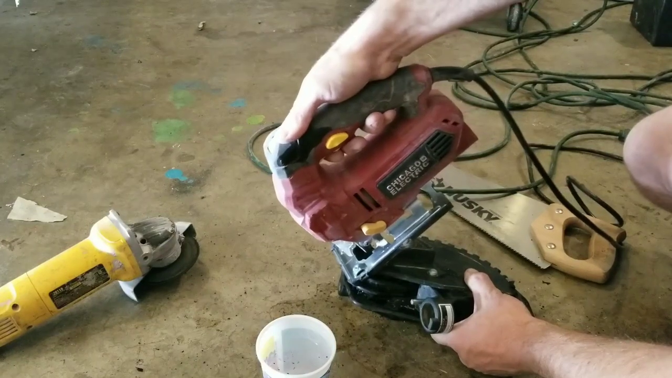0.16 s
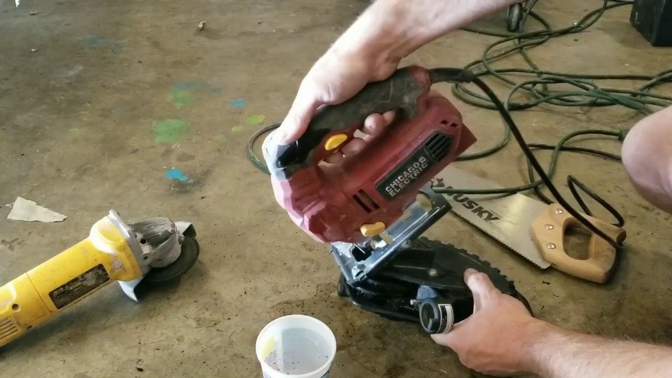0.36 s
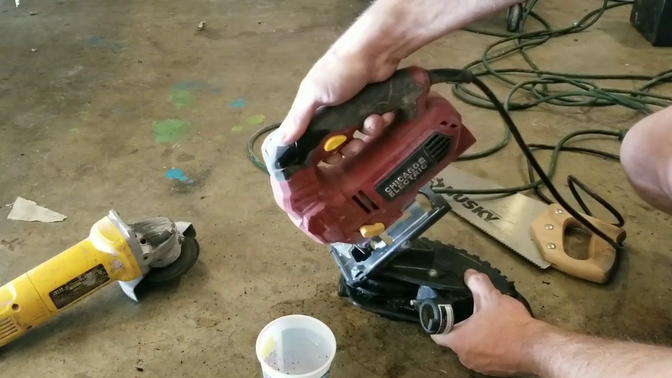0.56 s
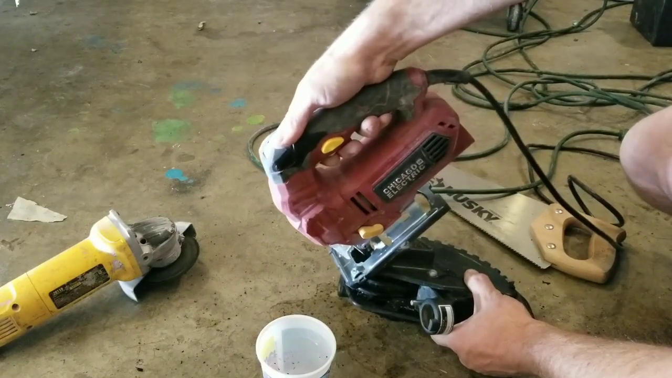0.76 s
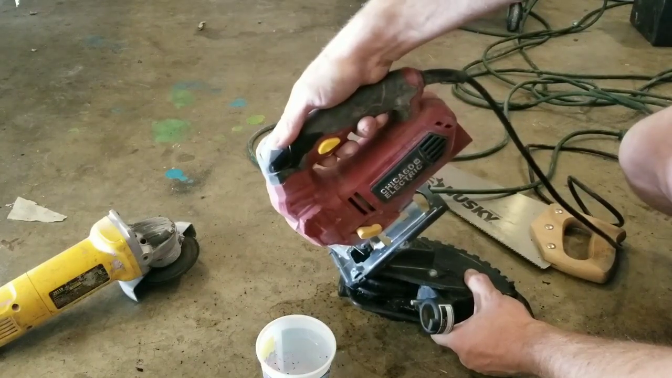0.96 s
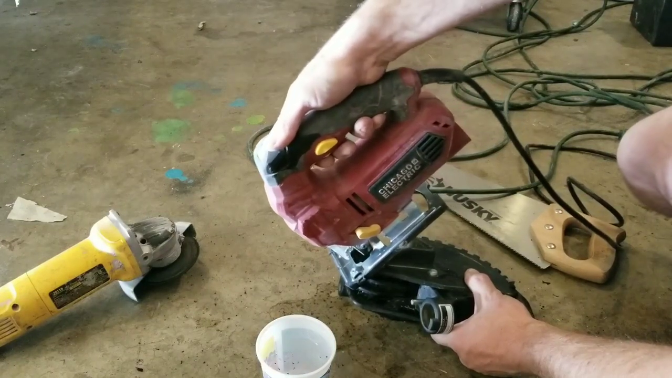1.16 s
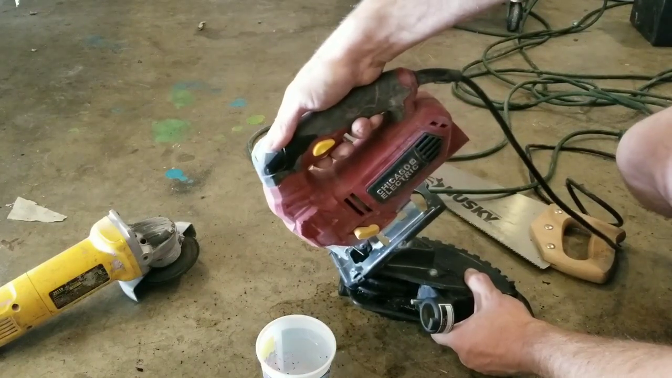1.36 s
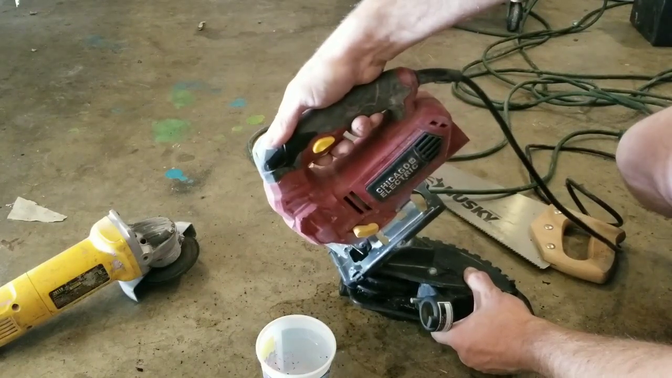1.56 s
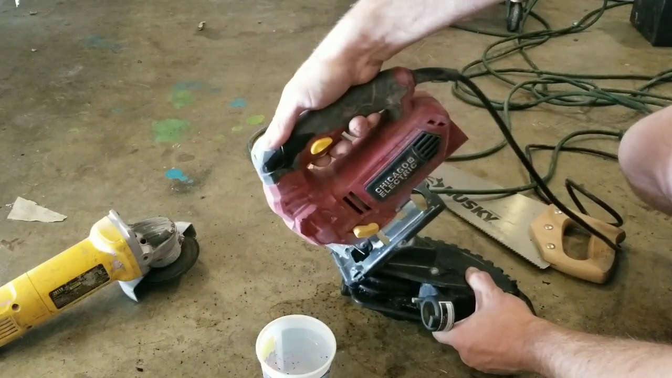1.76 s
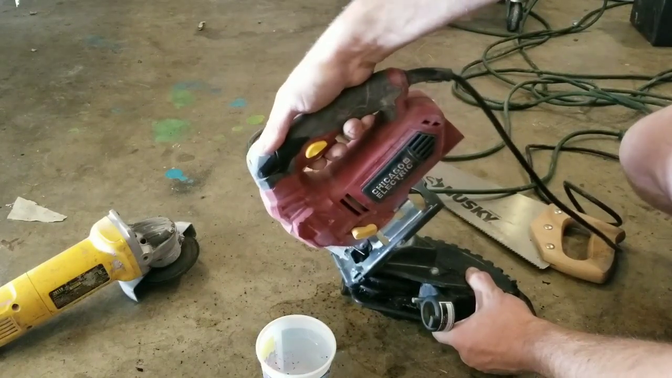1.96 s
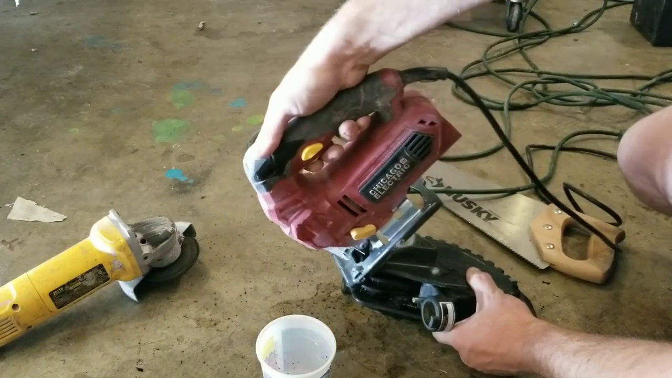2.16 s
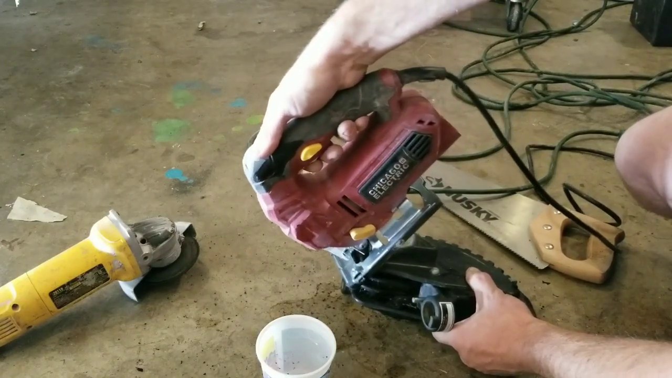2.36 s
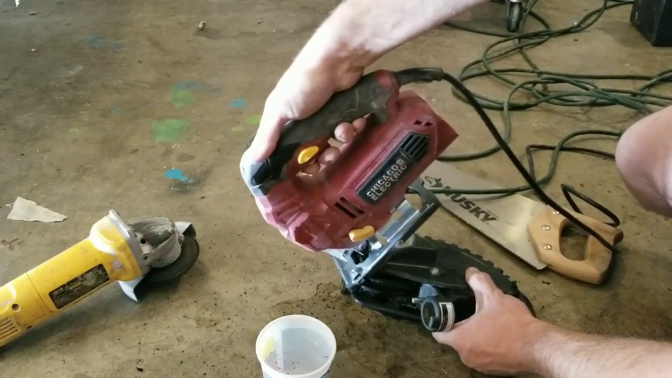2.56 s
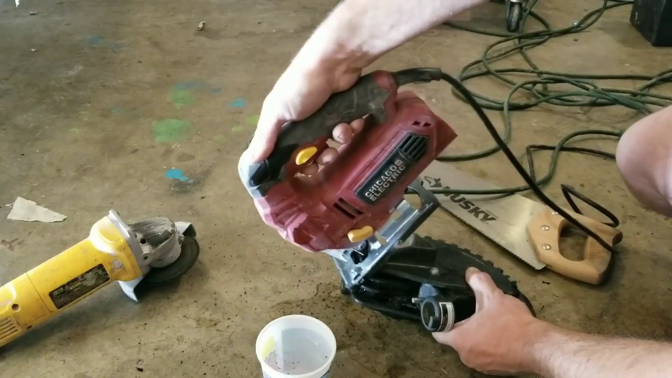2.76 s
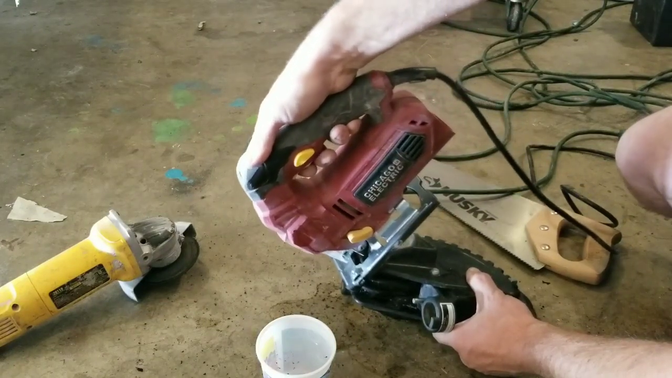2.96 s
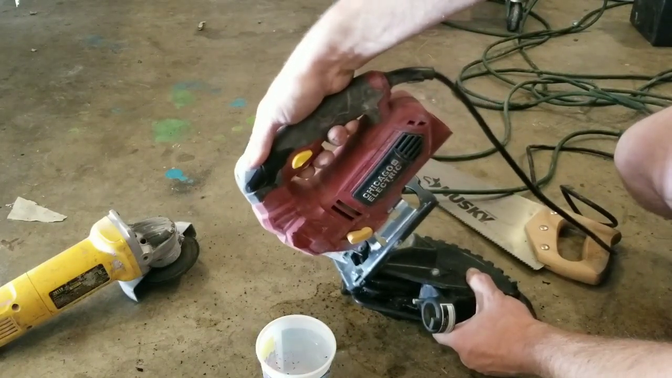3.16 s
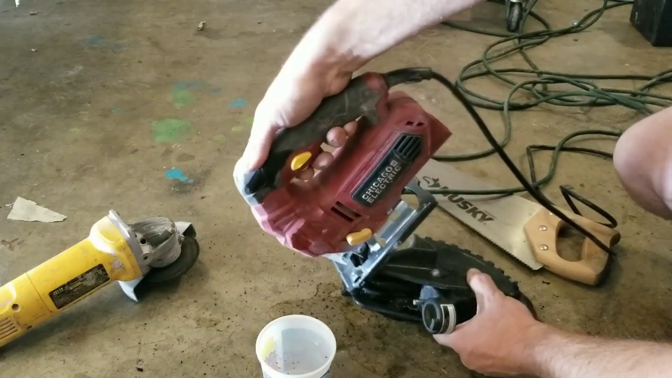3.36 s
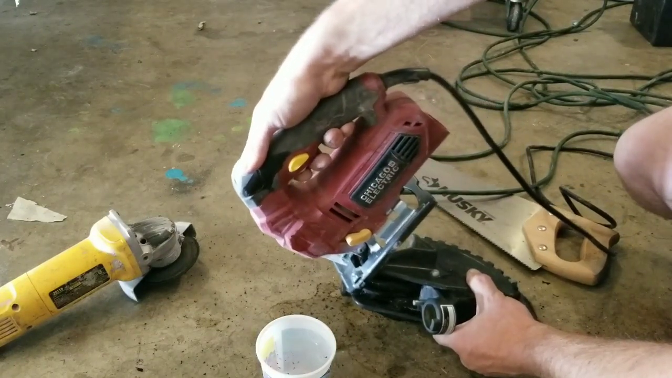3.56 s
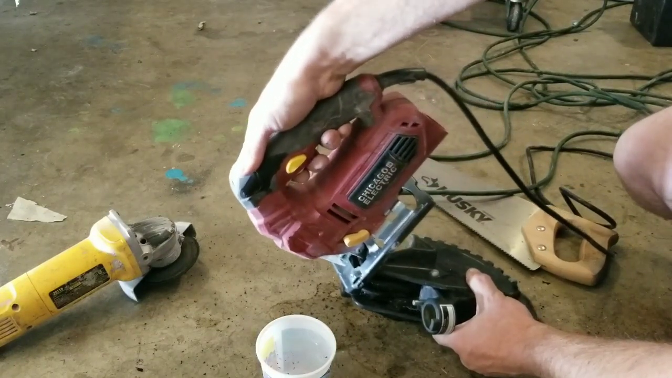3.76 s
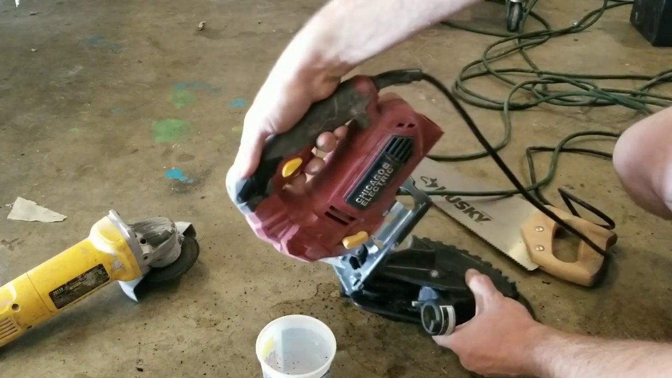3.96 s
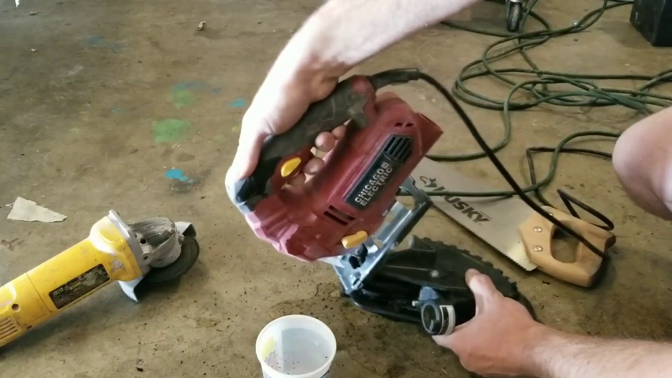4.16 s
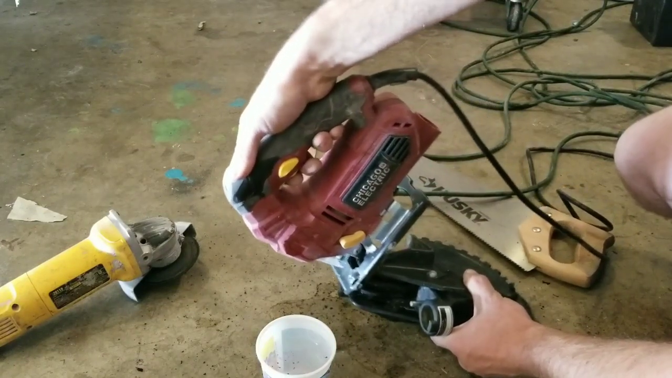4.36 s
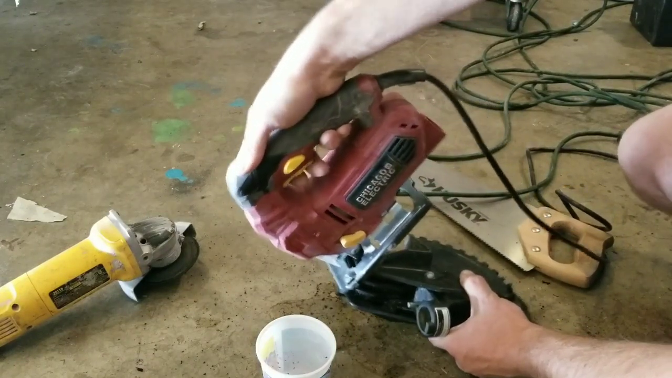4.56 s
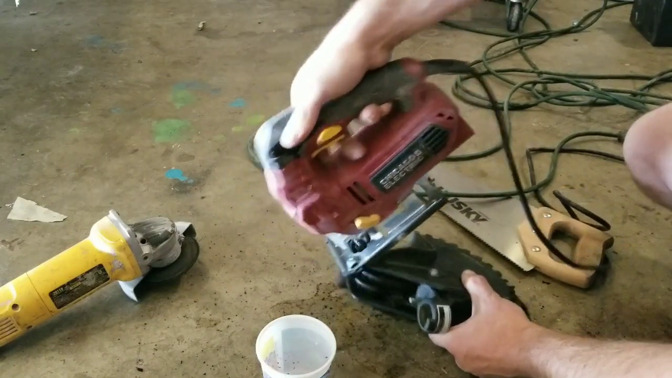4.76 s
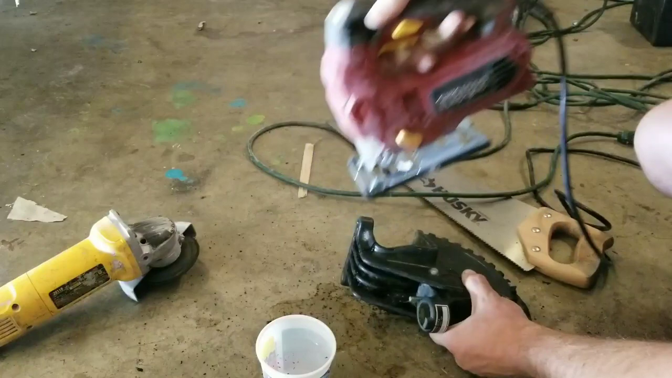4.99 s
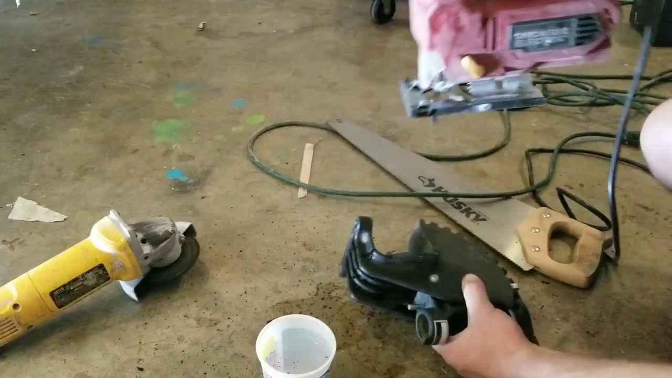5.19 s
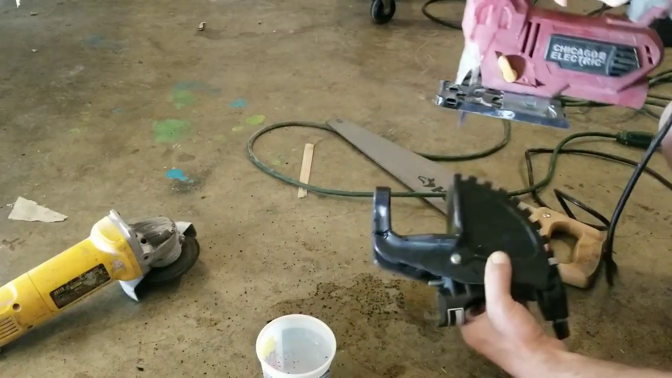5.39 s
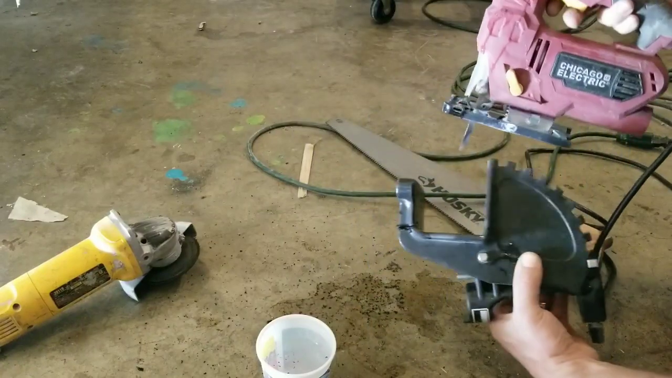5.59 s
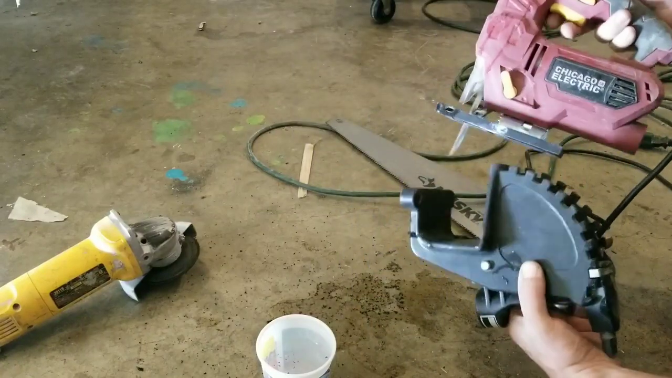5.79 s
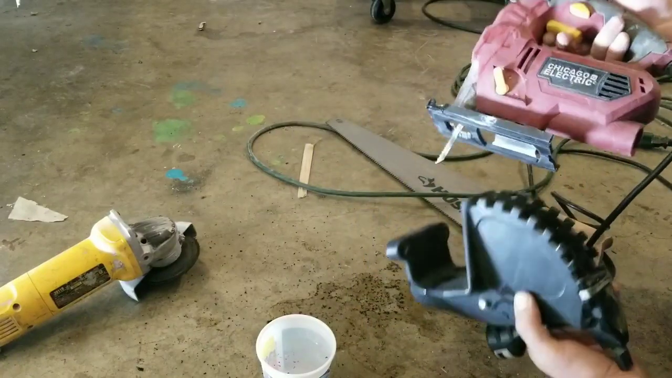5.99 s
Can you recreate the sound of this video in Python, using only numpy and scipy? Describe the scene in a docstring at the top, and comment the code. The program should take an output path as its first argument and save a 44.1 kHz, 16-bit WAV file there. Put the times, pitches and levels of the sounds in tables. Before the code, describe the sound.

A corded jigsaw is already cutting a hard plastic bracket, close to the microphone in a concrete garage. Rapid strokes merge into a coarse, knocking buzz with plastic rasp and a wavering gear whine. Near the end the loosened piece chatters and rings, the blade slips free, and the motor coasts down, whirring lower and louder as it comes closer.

```python
"""An electric jigsaw cuts through a plastic bracket held just above a concrete garage floor.
Its motor drives a crank through a whining gear; every stroke knocks in the housing and rasps through
the plastic: impacts ring resonances, tones follow the shaft, and coloured noise makes chips and air.
Near the end of the cut the loosened piece chatters, the blade comes free and the motor coasts down."""
import sys
import numpy as np
from scipy import signal
from scipy.fft import rfft, irfft, next_fast_len
from scipy.io import wavfile

SR = 44100
rng = np.random.default_rng(int(sys.argv[2]) if len(sys.argv) > 2 else 0)


def inscribe(sig):
    """Save sig as 16-bit PCM at rate SR to the path in sys.argv[1].

    A 1-D sig is mono; a 2-D sig holds one channel per row.
    Samples are clipped to [-1, 1] before scaling.
    """
    pcm = np.round(np.clip(np.atleast_2d(sig).T, -1, 1) * 32767)
    wavfile.write(sys.argv[1], SR, pcm.astype(np.int16))


N = 265922

GEAR_TEETH, PINION_TEETH = 48, 5
SWITCH_OFF_S, BRAKE_S = 4.62, 0.26  # trigger let go; the plastic brakes the blade for this long

# moments of load in every stroke: bite, long pull, return
# [angle/turn, width/turns, tooth load/dB, rasp swell/dB]
LOADED_MOMENTS = [(.53, .04, -1.5, 1.7), (.675, .045, -3.5, 2.6), (.14, .13, -11, 1.8)]
# resonances of the plastic bracket [f/Hz, width/Hz, relative level/dB]
BRACKET_MODES = [(297, 150, -19), (653, 84, -3), (898, 120, 0.5), (1290, 254, 4), (1620, 280, -16),
                 (2150, 1200, -16), (2800, 400, 2), (4430, 500, -4)]


def from_db(db):
    """Decibels to gain."""
    return 10 ** (np.asarray(db) / 20)


def rms_one(x):
    """Scale to rms 1."""
    return x / np.sqrt(np.mean(x ** 2) + 1e-20)


def in_time(rows):
    """Each column of a curve at every sample."""
    s, *columns = np.transpose(rows)
    return [np.interp(np.arange(N) / SR, s, column) for column in columns]


def ramp(start_s, length_s):
    """Rises evenly from 0 to 1."""
    return np.clip((np.arange(N) / SR - start_s) / length_s, 0, 1)


def gain_at(points, hz):
    """Gain of a dB table on a log-frequency axis."""
    f, db = np.transpose(points)
    return from_db(np.interp(np.log(hz + 1), np.log(f), db))


def drift(rate):
    """Smooth chance with rms 1, through a new random value this many times per second."""
    knots = rng.standard_normal(int(rate * N / SR) + 2)
    return rms_one(np.interp(np.arange(N) * rate / SR, np.arange(len(knots)), knots))


def swell(turns, angle, width):
    """A smooth bump once in every turn."""
    distance = (turns - angle + .5) % 1 - .5
    return np.exp(-.5 * (distance / width) ** 2)


def per_stroke(turns):
    """Chance with spread 1, drawn anew for every stroke."""
    return rng.standard_normal(size=400)[turns.astype(int)]


def stereo_noise(spectrum):
    """Coloured noise, alike in the bass and wide in the treble; its middle has spread 1."""
    # stereo width [f/Hz, side minus mid/dB]
    side_width = [(60, -25), (250, -13.5), (500, -12.5), (1000, -8), (2000, -5.5), (4000, -1), (8000, 0),
                  (15000, -1)]
    # stereo balance [f/Hz, left minus right/dB]
    balance = [(500, 1), (1500, -1), (2800, 2.5), (4200, -1), (5600, 1), (6900, -6.5), (8000, 2.5),
               (11000, 3.5), (14500, -1.5)]
    size = next_fast_len(N)
    mid, side = rfft(rng.standard_normal((2, size)))
    hz = np.arange(len(mid)) * SR / size
    side = side * gain_at(side_width, hz)
    left_over_right = gain_at(balance, hz)
    pair = np.array([(mid + side) * left_over_right, mid - side]) / np.sqrt(1 + left_over_right ** 2)
    pair = irfft(pair * gain_at(spectrum, hz), size)[:, :N]
    return pair / np.std(pair.mean(axis=0))


def resonate(x, modes):
    """Parallel two-pole resonances with alternating signs; a narrower mode rings longer."""
    out = 0
    for k, (hz, width, db) in enumerate(modes):
        r = np.exp(-np.pi * width / SR)
        zeros = [(1 - r * r) / 2, 0, (r * r - 1) / 2]
        poles = [1, -2 * r * np.cos(2 * np.pi * hz / SR), r * r]
        out = out + (-1) ** k * from_db(db) * signal.lfilter(zeros, poles, x + 1e-18)
    return out


def tone(turns, flutter_db, spread):
    """A sine of rms 1 whose level and phase (spread in radians) waver on their way to each ear."""
    ears = []
    for ear in range(2):
        level = np.sqrt(2) * from_db(flutter_db * drift(11))
        ears.append(level * np.sin(2 * np.pi * turns + spread * drift(7.6)))
    return np.array(ears)


def bursts(events, decay_s):
    """An envelope that jumps at each event and dies away."""
    kicks = np.zeros(N)
    for s, db in events:
        kicks[round(s * SR)] = from_db(db)
    return signal.lfilter([1], [1, -np.exp(-1 / (decay_s * SR))], kicks)


def blade_speed(friction_hz_per_s=6.45, drag_loss_hz=21.5, drag_s=1.5, brake_loss_hz=4.68):
    """Strokes per second: sagging in the cut, then slowed by friction, early air drag and the plastic."""
    # blade speed while the trigger is held [t/s, stroke rate/Hz]
    held_speed = [(0, 40.33), (.729, 39.485), (1.665, 39.252), (2.164, 38.365), (2.673, 38.418),
                  (3.421, 37.634), (4.042, 37.306)]
    coast_s = np.maximum(np.arange(N) / SR - SWITCH_OFF_S, 0)
    friction = friction_hz_per_s * coast_s
    drag = drag_loss_hz * (1 - np.exp(-coast_s / drag_s))
    brake = brake_loss_hz * ramp(SWITCH_OFF_S, BRAKE_S)
    return in_time(held_speed)[0] - friction - drag - brake


def hand():
    """Push in dB, and the forward lean from 0 to 1."""
    # the hand on the saw; lean shifts from the backward to the forward housing modes
    # [t/s, push into the cut/dB, forward lean/dB]
    grip = [(0, 1, -9), (.45, .5, -24), (1.4, 0, -11.5), (2.1, 0, -10), (3.1, -1, 3), (4.55, .5, 10),
            (4.85, -2.5, -3)]
    push_db, lean_db = in_time(grip)
    return push_db, 1 / (1 + from_db(-lean_db))


def touching(clear_s=4.83, release_s=0.37):
    """1 while the blade rubs on the bracket, falling to 0 as it slips clear."""
    return (1 - ramp(clear_s, release_s)) ** 2


def over_stroke(turns, slack_db=-64.0):
    """Tooth load and rasp gain swell around each loaded moment of the turn."""
    load, rasp_db = from_db(slack_db), 0
    for angle, width, tooth_db, swell_db in LOADED_MOMENTS:
        bump = swell(turns, angle, width)
        load = load + from_db(tooth_db) * bump
        rasp_db = rasp_db + swell_db * bump
    return load, from_db(rasp_db)


def reversal_throb(turns, depth):
    """Level swing that peaks twice a stroke, at each reversal of the blade."""
    return 1 + depth * np.cos(4 * np.pi * (turns - LOADED_MOMENTS[0][0]))


def crank_force(speed, settle_rise_db=15.0, settle_s=0.36, idle_db=-11.0, idle_power=2.0,
                speed_power=1.7, push_share=0.27):
    """Force builds as the blade settles into the cut; in free air only the parts' own inertia is left."""
    pace = speed / speed.max()
    force_db = push_share * hand()[0] + settle_rise_db * ramp(0, settle_s)
    cutting = from_db(force_db) * pace ** speed_power
    return cutting * touching() + from_db(idle_db) * pace ** idle_power


def garage_murmur(level_db=-58.5):
    """The low murmur of the garage is steady noise, strongest in the bass."""
    # murmur colour [f/Hz, relative level per Hz/dB]
    murmur_colour = [(30, -16), (60, -8), (95, 0), (150, -10), (400, -31)]
    return from_db(level_db) * stereo_noise(murmur_colour)


def fan(turns, speed, air_db=-26.0, full_flow_hz=26.7, flow_power=1.45, throb=0.14):
    """Rushing air and sliding parts throb at each reversal and fade below the full-flow stroke rate."""
    # air colour [f/Hz, relative level per Hz/dB]
    air_colour = [(30, -46), (90, -38), (160, -25), (350, -16), (530, -14), (730, -5.5), (1100, -6),
                  (1900, -6), (2900, -6), (4200, -10), (6200, -13), (10200, -22), (12500, -16.5),
                  (15400, -16.5)]
    flow = np.minimum(speed / full_flow_hz, 1) ** flow_power
    return from_db(air_db) * flow * stereo_noise(air_colour) * reversal_throb(turns, throb)


def motor(turns, speed, rotor_power=4.3, carrier_db=-54.0, carrier_order=3, whistle_order=42,
          brush_rise_s=0.9):
    """Unbalance, fan and commutator tones all follow the rotor; the brushes start to sing as it coasts."""
    # rotor unbalance carried by the body [rotor f/Hz, level/dB]
    unbalance_level = [(100, -54), (118, -76), (175, -62), (260, -63), (370, -45)]
    # rotor tones [multiple of rotor speed, level at full speed/dB]
    rotor_tones = [(2, -47), (3, -52), (6, -49), (11, -48), (24, -51), (30, -53)]
    # the rotor's high whistle at each pitch [f/Hz, level/dB]
    whistle_level = [(13000, -60), (14800, -44), (15060, -33.5), (15250, -34), (15500, -36), (15650, -55)]
    # brush singing, strongest at the rate of the 24 commutator bars
    # [multiple of rotor speed, level before housing/dB]
    brush_tones = [(24, -39), (30, -51), (36, -54), (42, -57), (48, -48), (54, -52), (60, -49), (66, -50),
                   (72, -48), (78, -50), (84, -51), (96, -53), (108, -54), (120, -55)]
    # how well the housing radiates the brushes [f/Hz, gain/dB]
    brush_colour = [(2500, -17), (3050, -12), (3350, -18), (3700, -5), (3950, .5), (4350, -2), (4700, -2.5),
                    (5100, .5), (5450, -1), (5700, -7), (6100, -13), (6750, -2), (7400, -9), (8000, -13),
                    (11500, -14), (13000, -2), (14500, 2.5), (15500, 1), (16500, -40)]
    gearing = GEAR_TEETH / PINION_TEETH
    rotor, rotor_hz, pace = turns * gearing, speed * gearing, speed / speed.max()
    unbalance = gain_at(unbalance_level, rotor_hz) * tone(rotor, flutter_db=1, spread=0.055)
    # leaning forward, the sliding blade carrier hums at a multiple of the stroke rate
    hum = from_db(carrier_db) * hand()[1] * tone(carrier_order * turns, flutter_db=3.0, spread=0.1)
    for k, db in rotor_tones:
        hum = hum + from_db(db) * tone(k * rotor, flutter_db=7.5, spread=0.66)
    whistle = gain_at(whistle_level, whistle_order * rotor_hz)
    whistle = whistle * tone(whistle_order * rotor, flutter_db=1, spread=.35)
    singing = 0
    for k, db in brush_tones:
        level = from_db(db) * gain_at(brush_colour, k * rotor_hz)
        singing = singing + level * tone(k * rotor + .06 * drift(110), flutter_db=2.5, spread=.45)
    return unbalance + pace ** rotor_power * hum + whistle + ramp(SWITCH_OFF_S, brush_rise_s) * singing


def free_gears(turns, speed, level_db=-32.0, speed_power=1.3, throb=.45):
    """Unloaded, the teeth rattle in their play, most at each reversal, and ring the gear case."""
    # gear case, heard once the blade runs free [f/Hz, width/Hz, relative level/dB]
    case_modes = [(750, 57, -4), (1250, 53, 4), (1490, 90, -1), (1770, 41, 5), (2060, 88, -1),
                  (4290, 150, -6)]
    free = 1 - touching()
    rattle = rng.standard_normal(N) + .5 * rng.standard_normal((2, N))
    ringing = rms_one(resonate(rattle * reversal_throb(turns, throb), case_modes))
    return from_db(level_db) * free * (speed / speed.max()) ** speed_power * ringing


def gear_whine(turns, speed, speed_power=1.4, bead_spread_db=1.15, between_beads=.4,
               coast_between_beads=.3, coast_unrest=.08, octave_unrest=.12, unrest_per_s=90,
               octave_swing=.17):
    """The tooth rate sings in two beads a stroke under its octave; coasting, it slides through resonances.

    Unrest and swing are phase deviations in cycles.
    """
    # gear whine in the cut [t/s, bite level/dB, return level/dB, octave level/dB]
    whine_levels = [(0, -17, -21, -36), (.2, -28, -33, -27), (.4, -31, -35, -37), (.47, -15, -24, -36),
                    (.6, -26, -35, -37), (1.2, -19, -35, -30.5), (1.45, -28.5, -53, -35),
                    (1.85, -22, -55, -40), (2.03, -20, -28, -27), (2.3, -24, -23, -46),
                    (2.47, -27, -27, -37), (2.88, -25, -19.5, -43), (3.15, -23, -36, -38),
                    (3.35, -23, -29, -43), (3.75, -25, -43, -40), (4.0, -37, -46, -44),
                    (4.6, -35, -44, -36), (4.8, -42, -48, -48)]
    # resonances that the coasting whine slides through [f/Hz, width/Hz, level at full speed/dB]
    whine_peaks = [(1340, 190, -27.5), (790, 75, -31)]
    mesh_turns = turns * GEAR_TEETH
    bite, back, octave = from_db(in_time(whine_levels)) * touching()
    # part of the return level sounds all through the stroke
    return_bead = between_beads + (1 - between_beads) * swell(turns, angle=.18, width=.085)
    beads = bite * swell(turns, angle=.595, width=.075) + back * return_bead
    beads = beads * from_db(bead_spread_db * per_stroke(turns))
    mesh = beads * tone(mesh_turns, flutter_db=0.5, spread=0.069)

    response = 0
    for hz, width, db in whine_peaks:
        detuning = 2 * (speed * GEAR_TEETH - hz) / width
        response = response + from_db(db) / (1 + detuning ** 2)
    coast_bead = rms_one(coast_between_beads + swell(turns, angle=.62, width=.13))
    coasting = response * (speed / speed.max()) ** speed_power * coast_bead * ramp(SWITCH_OFF_S, BRAKE_S)
    slide = tone(mesh_turns + coast_unrest * drift(unrest_per_s), flutter_db=2, spread=.2)

    waver = octave_swing * np.sin(2 * np.pi * turns) + octave_unrest * drift(unrest_per_s)
    octave_tone = tone(2 * mesh_turns + waver, flutter_db=0.0, spread=0.72)
    return mesh + coasting * slide + octave * octave_tone


def breakthrough(knock_db=14.0, ring_db=21.5, clatter_db=-13.5, buzz_db=-25.0, buzz_s=0.014,
                 thud_db=7.0, snag_db=0.5, scatter=0.86):
    """Slaps thud on the bracket and leave the loose piece ringing and buzzing; the exiting teeth snag."""
    # about one slap a stroke at first, then uneven bounces mixed with stroke-timed knocks and rings
    # [t/s, relative bracket knock/dB, relative ring of the piece/dB]
    slaps = [(4.464, -16, -24), (4.493, -17, -26), (4.518, -6, -11), (4.547, -9, -10), (4.574, -6, -10),
             (4.6, -11, -12), (4.627, -16, -13), (4.655, -15, -11.5), (4.685, -13, -15), (4.712, -19, -14),
             (4.723, -13, -26), (4.755, -9, -17), (4.783, -24, -18), (4.792, -10, -23), (4.814, -26, -21),
             (4.848, -22, -21), (4.86, -15, -32), (4.891, -14, -26), (4.932, -13, -17), (4.968, -22, -27)]
    # sharp bursts of noise as the cut ends, some in time with the crank's strokes [t/s, relative level/dB]
    snag_events = [(4.7395, -13.5), (4.7725, -10.5), (4.816, -18), (4.883, -26), (4.92, -20.5)]
    # snag colour [f/Hz, relative level per Hz/dB]
    snag_colour = [(100, -40), (300, -13), (1500, -24), (4200, 6.5), (8000, -4), (11000, -7), (15500, -11)]
    # resonances of the piece being cut off [f/Hz, width/Hz, relative level/dB]
    piece_modes = [(1335, 85, 7), (1435, 65, 5), (1790, 110, -1), (2100, 220, -3)]
    knocks = [(s, db) for s, db, _ in slaps]
    rings = [(s, db) for s, _, db in slaps]
    contact = rng.standard_normal(N) + scatter * rng.standard_normal((2, N))
    clatter = from_db(clatter_db) * contact * bursts(knocks, decay_s=0.0048)
    blows = bursts(knocks, decay_s=0.00019) + clatter
    thud_band = signal.butter(2, [290, 700], "band", fs=SR, output="sos")
    thud = signal.sosfilt(thud_band, bursts(knocks, decay_s=0.00008) + 1e-18)
    buzz = from_db(buzz_db) * contact * bursts(rings, decay_s=buzz_s)
    piece = resonate(bursts(rings, decay_s=0.000091) + buzz, piece_modes)
    snags = stereo_noise(snag_colour) * bursts(snag_events, decay_s=0.0043)
    on_bracket = from_db(knock_db) * resonate(blows, BRACKET_MODES) + from_db(thud_db) * thud
    return on_bracket + from_db(ring_db) * piece + from_db(snag_db) * snags


def sawing(turns, rasp_gain, rasp_db=-21.5, hiss_db=-25.0, rub_db=-14.0, cut_ends_s=4.78,
           cut_release_s=0.066, loose_s=4.48, loose_for_s=0.245,
           shake_db=-45.5, shake_lean_db=-10.0, shake_loose_db=0.0, shake_wander_db=3,
           shake_wander_per_s=3, rumble_db=-6.0, ring_db=-28.0, ring_lean_db=-6.0,
           ring_loose_db=7.0, grain_db=0.5, bite_db=0.73):
    """Teeth tear out uneven chips and ring the bracket; leaning steadies it, the loosening piece frees it."""
    # colours of the rasp, its treble hiss and the teeth's push on the bracket
    # [f/Hz, relative level per Hz/dB]
    rasp_colour = [(30, -48), (110, -44), (220, -21), (370, -14), (500, -13), (700, -16), (920, -6),
                   (1130, -11.5), (1400, -2.5), (2200, -3.5), (3000, -2.5), (4500, -4.5), (5900, -9.5),
                   (7100, -6), (8500, -14.5), (11000, -33)]
    hiss_colour = [(6500, -29), (8000, -8), (9700, -1), (11200, -0.5), (12500, 1.5), (14000, 2), (15500, 1)]
    push_colour = [(250, 10.5), (600, 6), (900, 7), (1400, -0.5), (4000, -33)]
    # rumble of the shaking body [f/Hz, relative level per Hz/dB]
    rumble_colour = [(30, -17), (70, 2), (130, 2), (260, -7), (500, -21), (1200, -40)]
    # shaking of the body [multiple of stroke rate, relative level/dB]
    shake_tones = [(2, -14), (3, -5.5), (4, -7), (5, -6), (6, -11.5), (7, -1), (8, -4.5), (10, 0.5),
                   (11, -5.5), (12, -6)]
    push_db, forward = hand()
    # a little rubbing remains after the teeth leave the plastic
    cutting = np.maximum(1 - ramp(cut_ends_s, cut_release_s), from_db(rub_db))
    loose = ramp(loose_s, loose_for_s)
    chips = from_db(grain_db * drift(900) + bite_db * drift(70))
    rasp = from_db(rasp_db) * stereo_noise(rasp_colour) + from_db(hiss_db) * stereo_noise(hiss_colour)
    ring_gain = from_db(ring_db + ring_lean_db * forward + ring_loose_db * loose)
    ring = ring_gain * rms_one(resonate(chips * stereo_noise(push_colour), BRACKET_MODES))
    shake = 0
    for k, db in shake_tones:
        # each multiple swells and sinks with the grip
        level = np.sqrt(2) * from_db(db + shake_wander_db * drift(shake_wander_per_s))
        shake = shake + level * np.sin(2 * np.pi * (k * turns + rng.random()))
    shake_gain = from_db(shake_db + shake_lean_db * forward + shake_loose_db * loose)
    thrum = shake_gain * (shake + from_db(rumble_db) * stereo_noise(rumble_colour))
    return ((rasp * chips * rasp_gain + ring) * cutting + thrum) * from_db(push_db) * touching()


def backlash(turns, angle=.553, scatter_turns=.001, spread_db=1.2, pan_db=2):
    """Play in the crank closes with a hard knock on the blade carrier once a stroke, in varying force."""
    # the knock hardens deep in the cut and dies in free air [t/s, relative force/dB]
    knock_force = [(0, -8), (.45, -6), (1.1, -6), (1.35, 0), (2.3, 0), (2.9, -1), (4.6, -1), (4.85, -5),
                   (4.97, -17), (6, -22)]
    # blade carrier, leaning back and leaning into the cut [f/Hz, width/Hz, relative level/dB]
    carrier_back = [(2770, 260, 16.5), (4700, 900, -3)]
    carrier_forward = [(3050, 170, 19.5), (4700, 900, 0), (7150, 500, 1)]
    clicks = np.diff(np.floor(turns - angle + scatter_turns * per_stroke(turns)), prepend=-1)
    blows = clicks * from_db(in_time(knock_force)[0] + spread_db * per_stroke(turns))
    forward = hand()[1]
    ringing = resonate(blows * (1 - forward), carrier_back) + resonate(blows * forward, carrier_forward)
    return ringing * from_db([[pan_db], [-pan_db]])


def crank(turns, load, force, stroke_spread_db=1.0, level_db=-23.5, pan_db=0.5):
    """Loaded teeth strike and rattle, with wear that repeats on every turn; all of it rings the housing."""
    # housing, leaning back and leaning into the cut [f/Hz, width/Hz, relative level/dB]
    housing_back = [(1344, 37, -5), (1896, 80, -4.5), (2805, 70, 6.3), (3800, 110, -11)]
    housing_forward = [(1340, 90, -9), (1830, 150, -10.5), (2330, 200, -11), (2650, 110, -2.5),
                       (2950, 130, 1), (3085, 90, 3.5), (3620, 160, -17), (4830, 300, -5), (5300, 200, -8),
                       (7200, 400, -11)]
    teeth = rms_one(load * np.diff(np.floor(turns * GEAR_TEETH), prepend=0))
    wear = []
    for face in rng.standard_normal((2, 1024)):
        wear.append(np.interp(turns, np.arange(len(face)) / len(face), face, period=1))
    worn = rms_one(load * np.array(wear))
    rattle = rms_one(load * rng.standard_normal((2, N)))
    contact = from_db(-4) * teeth + from_db(-1) * worn + from_db(-4) * rattle
    drive = contact * from_db(stroke_spread_db * per_stroke(turns)) * force
    forward = hand()[1]  # share of the force that reaches the forward modes
    ringing = resonate(drive * (1 - forward), housing_back) + resonate(drive * forward, housing_forward)
    return from_db(level_db) * rms_one(ringing) * from_db([[pan_db], [-pan_db]])


def garage(x, wet_db=-14.0, gap_s=0.0044, t60_s=0.22):
    """A diffuse tail off floor and walls, different at each ear."""
    t = np.arange(SR // 2) / SR
    tail = rng.standard_normal((2, len(t))) * from_db(-60 * t / t60_s) * (t > gap_s)
    tail /= np.sqrt(np.sum(tail ** 2, axis=1, keepdims=True))
    return x + from_db(wet_db) * signal.fftconvolve(x, tail, axes=1)[:, :N]


def nearness(start_s=5.88, takes_s=0.095, rise_db=5.5):
    """Gain of the coasting saw as it is brought nearer."""
    return from_db(rise_db * ramp(start_s, takes_s))


def scene(left_lag_samples=2):
    """One shaft speed drives every part of the saw, whose sound reaches the right ear first."""
    speed = blade_speed()
    turns = np.cumsum(speed) / SR
    load, rasp_gain = over_stroke(turns)
    knocks = crank(turns, load, crank_force(speed)) + backlash(turns)
    knocks = garage(knocks + free_gears(turns, speed) + breakthrough())
    whine = gear_whine(turns, speed) + motor(turns, speed)
    saw = knocks + whine + sawing(turns, rasp_gain) + fan(turns, speed)
    left, right = saw * nearness()
    left = np.pad(left, (left_lag_samples, 0))[:N]
    return np.array([left, right]) + garage_murmur()


def record(dry, top=1.9, cutoff_hz=15550):
    """The highest peaks are rounded and the top of the spectrum is cut steeply."""
    rounded = top * np.tanh(dry / top)
    low_pass = signal.ellip(12, .1, 90, cutoff_hz, fs=SR, output="sos")
    return signal.sosfilt(low_pass, rounded)


dry = scene()
out = record(dry)
inscribe(out)
```